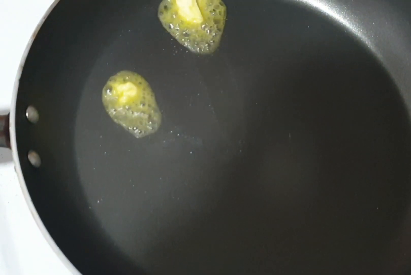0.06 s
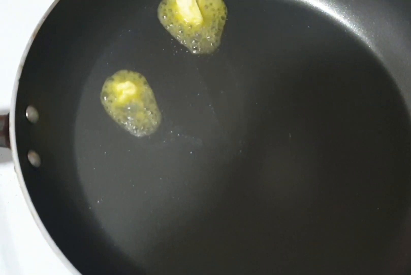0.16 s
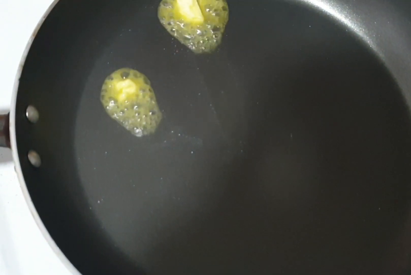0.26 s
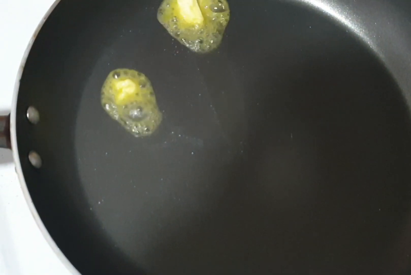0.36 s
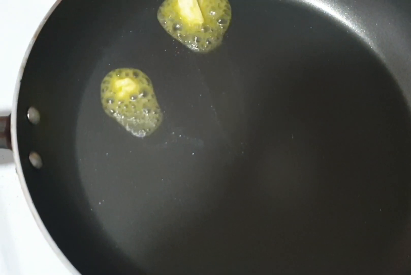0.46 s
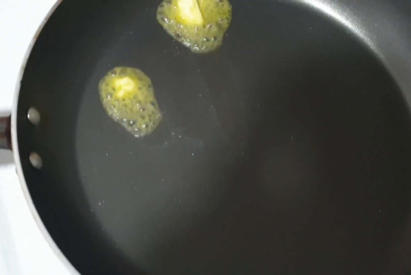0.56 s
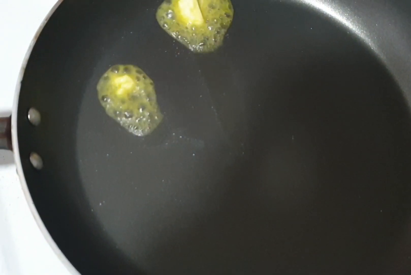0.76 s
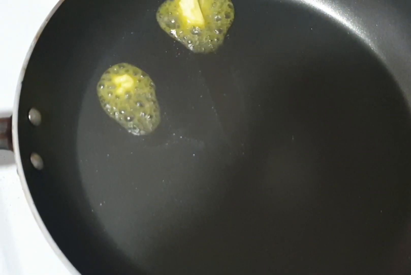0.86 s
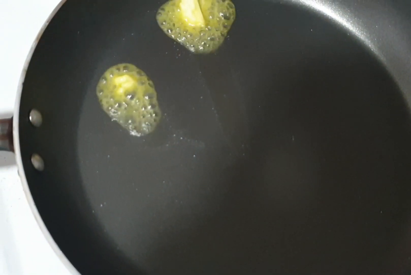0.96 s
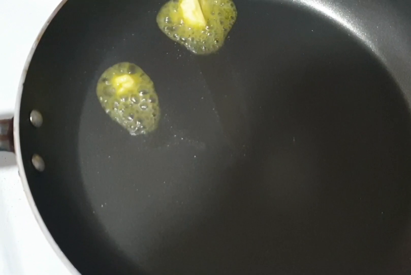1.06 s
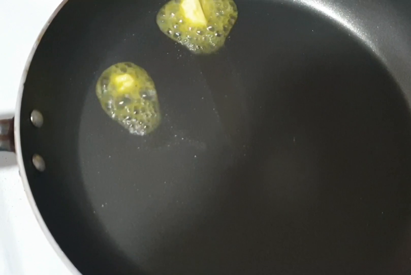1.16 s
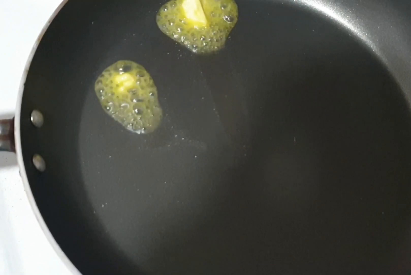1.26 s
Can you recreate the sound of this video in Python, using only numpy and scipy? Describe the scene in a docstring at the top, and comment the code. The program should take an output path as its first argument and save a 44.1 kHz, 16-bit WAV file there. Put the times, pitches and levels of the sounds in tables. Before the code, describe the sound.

Butter sizzles in a frying pan while a steel utensil briefly clatters on the worktop.

```python
"""A kitchen: two lumps of butter sizzle in a hot frying pan, a fine hiss of tiny bursting bubbles
with a few sharper spits. Nearby a steel utensil, probably a knife, is put down on the worktop:
it clatters, rings and settles with a lighter clink. The room echoes over a low hum.
The right microphone is shaded and hears little treble."""
import sys
import numpy as np
from scipy import signal
from scipy.fft import rfft, irfft, next_fast_len
from scipy.io import wavfile
from scipy.ndimage import map_coordinates

SR = 44100
rng = np.random.default_rng(int(sys.argv[2]) if len(sys.argv) > 2 else 0)


def wav_record(signal):
    """Record a signal, one row per channel, as 16-bit PCM in the file named by sys.argv[1]."""
    frames = np.transpose(np.atleast_2d(signal))
    bounded = np.clip(frames, -1, 1)
    # unit amplitude maps onto the largest positive 16-bit level
    quanta = np.round(bounded * 32767).astype(np.int16)
    wavfile.write(sys.argv[1], SR, quanta)


N = 57330
HIT_SAMPLES, TAIL_SAMPLES, BURST_SAMPLES = 12000, 20000, 3000
ATTACK_S = 0.0013


def amp(db):
    """Decibels to gain."""
    return 10 ** (np.asarray(db) / 20)


def unit_rms(x):
    """x scaled to rms 1."""
    return x / np.sqrt(np.mean(x ** 2) + 1e-20)


def along(points, hz):
    """(frequency [Hz], value) points interpolated on a log axis."""
    knots_hz, values = np.transpose(points)
    return np.interp(np.log(hz + 1), np.log(knots_hz + 1), values)


def wobble(knots_per_s):
    """Smooth random curve."""
    knots = rng.standard_normal(int(N * knots_per_s / SR) + 4)
    return map_coordinates(knots, [np.arange(N) * knots_per_s / SR])


def filtered(x, response):
    """Zero-phase filter with gain response(hz)."""
    n = x.shape[-1]
    size = next_fast_len(n + 2048)
    return irfft(rfft(x, size) * response(np.fft.rfftfreq(size, 1 / SR)), size)[..., :n]


def coloured(x, spectrum):
    """x shaped by a spectrum, at rms 1."""
    return unit_rms(filtered(x, lambda hz: amp(along(spectrum, hz))))


def diffuse(size=N):
    """Flat stereo noise, partly alike in the bass, unrelated in the treble."""
    # (frequency [Hz], left-right correlation [1])
    correlation = [(60, 0.25), (300, 0.98), (700, 0.59), (1400, 0.0036), (3000, 0)]
    angle = np.arccos(np.clip(along(correlation, np.fft.rfftfreq(size, 1 / SR)), -1, 1)) / 2
    mid, side = irfft(rfft(rng.standard_normal((2, size))) * [np.cos(angle), np.sin(angle)], size)
    return np.array([mid + side, mid - side])


def add(out, start_s, x):
    """Mix x into out."""
    i = max(round(start_s * SR), 0)
    out[..., i:i + x.shape[-1]] += x[..., :N - i]


def sizzle():
    """Thousands of tiny bursts a second, over the hiss into which the smallest merge."""
    # sizzle envelope, two runs of (time [s], level [dB])
    envelope = [
        [(0.0, -39), (0.19, -39), (0.2, -39.5)],
        [(0.62, -43.5), (1.268, -44.5), (1.3, -45.5)],
    ]
    # sizzle spectrum (frequency [Hz], density [dB])
    fizz = [(300, -26), (1100, -17.5), (1500, -14), (2400, -15.5), (3300, -9), (4300, -5.5), (5300, -0.5),
            (6500, -3.5), (8200, -12), (9400, -1), (11000, 0), (12600, -3), (14000, -2), (15800, -8)]
    bubbles_per_s, spread_db, flutter_db = 3000, 5, 0.45
    level_db = np.interp(np.arange(N) / SR, *np.vstack(envelope).T) + flutter_db * wobble(71.2)
    onsets = rng.random(N) < bubbles_per_s / SR
    bursts = onsets * amp(spread_db * np.minimum(rng.standard_normal(N), 2.5))
    bubbles = coloured(bursts * rng.choice([-1, 1], (2, N)), fizz)
    hiss = coloured(diffuse(), fizz)
    return amp(level_db) * (amp(2.5) * bubbles + amp(3.5) * hiss)


def background():
    """Wavering hum of appliances over a low rumble."""
    # hum tones (frequency [Hz], level [dB])
    tones = [(50, -53), (123, -66)]
    # room rumble (frequency [Hz], density [dB])
    rumble = [(20, -19), (35, -9), (60, -1), (85, -4.5), (130, -5), (180, -16.5), (290, -16), (410, -26),
              (630, -20), (735, -9.5), (830, -15.5), (1000, -22), (1400, -34), (4000, -32)]
    hum, t = np.zeros(N), np.arange(N) / SR
    for hz, db in tones:
        peak = np.sqrt(2) * amp(db + 4.1 * wobble(4.42))
        hum += peak * np.sin(2 * np.pi * hz * t + 0.5 * wobble(5.6))
    return hum + amp(-53) * coloured(diffuse(), rumble)


def spits():
    """Larger bubbles burst with a brief ping and a crack around the same pitch."""
    # pops and sputters of fat (time [s], level [dB], pitch [Hz], rise [ms])
    pops = [(0.0408, -27, 13100, .4), (.066, -38, 5700, 3), (0.082, -39, 5860, 2.8),
            (0.1333, -22.5, 10830, 0.55), (.185, -43, 9800, 0.98), (0.546, -32, 10200, 0.76),
            (.576, -34, 5600, 1.45), (0.6679, -31, 5600, 1.5), (.740, -38, 5970, 3.3),
            (0.766, -34.5, 10300, 2.7), (0.85, -39, 4620, 1.5), (0.897, -33, 11500, 3.5),
            (.9635, -43, 11000, 1.8), (.966, -35, 5600, 3.3), (.971, -35.5, 9930, 1.9),
            (1.0140, -32, 10930, 0.86), (1.028, -23, 14100, .5), (1.1021, -29.5, 5560, 0.4),
            (1.2160, -23, 5080, 0.46), (1.247, -30, 10800, 0.77)]
    crack_octaves, ping_t60_s = 0.57, 0.04
    out, t = np.zeros((2, N)), np.arange(BURST_SAMPLES) / SR
    for start_s, db, hz, rise_ms in pops:
        noise = rng.standard_normal((2, BURST_SAMPLES))
        crack = filtered(noise, lambda f: 1 / (1 + (np.log2((f + 1) / hz) / crack_octaves) ** 2))
        ping = np.sin(2 * np.pi * hz * t) * amp(-60 * t / ping_t60_s)
        age = 1000 * t / rise_ms
        envelope = amp(db) * age * np.exp(1 - age)
        add(out, start_s, envelope * (ping + 0.68 * unit_rms(crack)))
    return out + amp(-3) * kitchen_echo(out)


def kitchen_echo(x):
    """Diffuse room tail; treble dies first."""
    # room decay (frequency [Hz], t60 [s])
    decay = [(200, 0.75), (1500, 0.6), (4000, 0.4), (8000, 0.46), (14000, 0.19)]
    hz, t, bins = signal.stft(diffuse(TAIL_SAMPLES), SR, nperseg=256)
    tail = signal.istft(bins * amp(-60 * t / along(decay, hz)[:, None]), SR, nperseg=256)[1]
    return signal.fftconvolve(x, tail / np.linalg.norm(tail[0]), axes=1)[:, :N]


def steel_ring(modes, tilt_db_per_octave=0):
    """One blow on steel; chatter against the worktop makes each mode flutter."""
    pivot_hz, chatter_per_s, chatter_depth = 4075, 175, 0.67
    out, t = np.zeros(HIT_SAMPLES), np.arange(HIT_SAMPLES) / SR
    for hz, db, t60_s in modes:
        level_db = db + tilt_db_per_octave * np.log2(hz / pivot_hz) + rng.normal()
        knots = rng.standard_normal(size=256) + 1j * rng.standard_normal(size=256)
        chatter = 1 + chatter_depth * np.interp(t * chatter_per_s, np.arange(len(knots)), knots)
        tone = np.exp(2j * np.pi * (hz * t + rng.random()))
        out += amp(level_db - 60 * t / t60_s) * np.imag(chatter * tone)
    return out * (1 - np.exp(-t / ATTACK_S))


def knock(t60_s=0.037):
    """Short dense rap on the worktop."""
    # knock spectrum (frequency [Hz], density [dB])
    spectrum = [(60, -19.5), (180, -21.5), (280, -17), (400, -20), (520, -11.5), (640, -25), (1000, -6),
                (1600, -1.5), (2400, -1.5), (3500, -4.5), (4400, -1.5), (5300, -11), (9000, -13),
                (13000, -12.5), (15800, -36)]
    t = np.arange(BURST_SAMPLES) / SR
    envelope = amp(-60 * t / t60_s) * (1 - np.exp(-t / ATTACK_S))
    rap = envelope * coloured(diffuse(BURST_SAMPLES), spectrum)
    return np.pad(rap, ((0, 0), (0, HIT_SAMPLES - BURST_SAMPLES)))


def thud(hz=66, rise_s=0.03, t60_s=0.85):
    """Low mode of the struck worktop."""
    t = np.arange(N) / SR
    return amp(-60 * t / t60_s) * (1 - np.exp(-t / rise_s)) * np.sin(2 * np.pi * hz * t)


def utensil():
    """Each contact rings the steel and knocks the worktop, which thuds; a last clink as it settles."""
    # contacts (time [s], ring level [dB], knock level [dB], ring tilt [dB/octave])
    contacts = [(0.219, -40, -33, -14), (0.225, -39.5, -25.5, -12.5), (.232, -24.5, -24.5, -9.5),
                (0.2362, -16, -16.5, -4), (.243, -20.5, -13.5, -6), (.250, -10, -9, 2.5),
                (.259, -16.5, -16, -4), (.270, -21.5, -27, 3), (.298, -17.5, -17, -7.5),
                (.312, -20, -20.5, -4.5), (.339, -17.5, -22.5, -4), (0.371, -48, -34.5, -2),
                (.412, -62, -58, 5)]
    # steel modes (frequency [Hz], level [dB], t60 [s])
    steel_modes = [(1355, -20, 0.14), (1644, -18.5, 0.14), (1869, -17, 0.12), (2412, -15, 0.13),
                   (3122, -14, .15), (4014, -7.5, 0.12), (4091, -0.5, 0.27), (4210, -11, 0.11),
                   (4342, -5.5, 0.13), (6410, -16, 0.11), (7400, -12.5, 0.1), (7560, -14.5, 0.28),
                   (7953, -7.5, 0.12), (11030, -7, 0.031), (11107, -3, 0.15), (12400, -34, .15),
                   (14050, -18, .08)]
    # settling clink modes (frequency [Hz], level [dB], t60 [s])
    clink_modes = [(2872, -9.5, 0.36), (2927, -10, 0.35), (4366, 0.5, 0.23), (6770, -9, 0.29),
                   (8012, -6.5, 0.19), (9600, -12, 0.056), (12170, -3.5, .08)]
    thud_s, settle_s = 0.228, 0.4757
    hits = [(start_s, amp(ring_db) * steel_ring(steel_modes, tilt), amp(knock_db) * knock())
            for start_s, ring_db, knock_db, tilt in contacts]
    hits.append((settle_s, amp(-27) * steel_ring(clink_modes), amp(-32) * knock()))
    out = np.zeros((2, N))
    for start_s, ring, rap in hits:
        add(out, start_s, amp(-4) * ring + rap)
        add(out, start_s, kitchen_echo(amp(-6) * ring + amp(4) * rap))
    add(out, thud_s, amp(-38) * thud())
    return out


def shaded(pair, shade):
    """The right microphone loses treble."""
    return np.array([pair[0], filtered(pair[1], lambda hz: amp(along(shade, hz)))])


def scene():
    """Pan, kitchen and utensil at the two microphones."""
    # right microphone re left, pan and room (frequency [Hz], gain [dB])
    pan_shade = [(60, -4.5), (400, 0), (750, 0), (1300, -10), (2400, -7.5), (4100, -19), (5500, -24),
                 (8000, -29), (9800, -21), (11200, -12.5), (12200, -15), (14000, -18)]
    # right microphone re left, utensil's direction (frequency [Hz], gain [dB])
    utensil_shade = [(60, 1.5), (400, -1), (750, 0), (1300, -8), (2400, -8.5), (4100, -15.5), (5500, -21),
                     (8000, -25), (9800, -23), (11100, -7), (12100, -11), (13000, -20)]
    return shaded(sizzle() + spits() + background(), pan_shade) + shaded(utensil(), utensil_shade)


def record(dry):
    """Soft clipping of the highest peaks, then a band limit."""
    ceiling, top_hz = 0.99, 15850
    clipped = dry / (1 + (dry / ceiling) ** 6) ** (1 / 6)
    return filtered(clipped, lambda hz: hz < top_hz)


dry = scene()
out = record(dry)
wav_record(out)
```